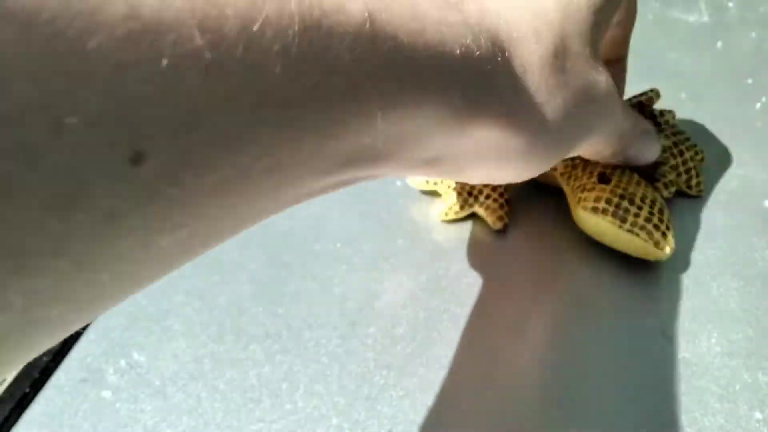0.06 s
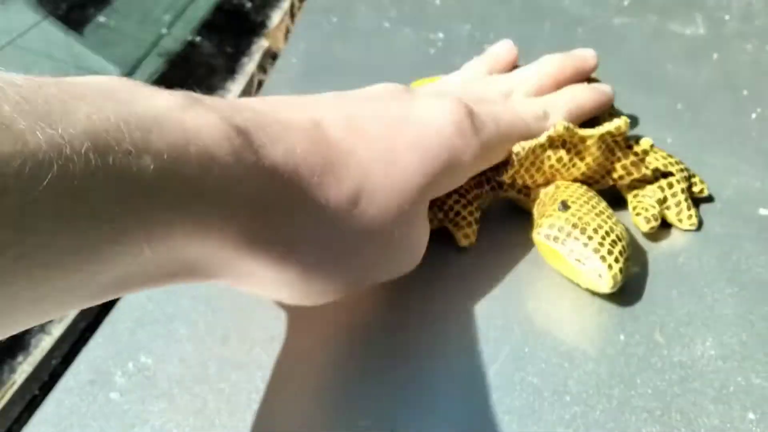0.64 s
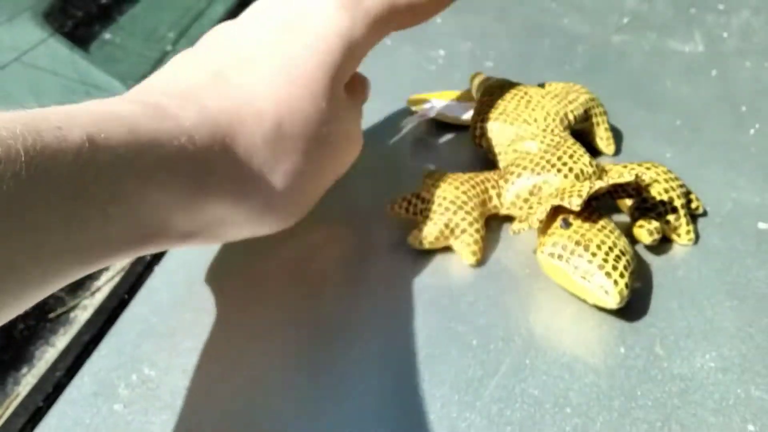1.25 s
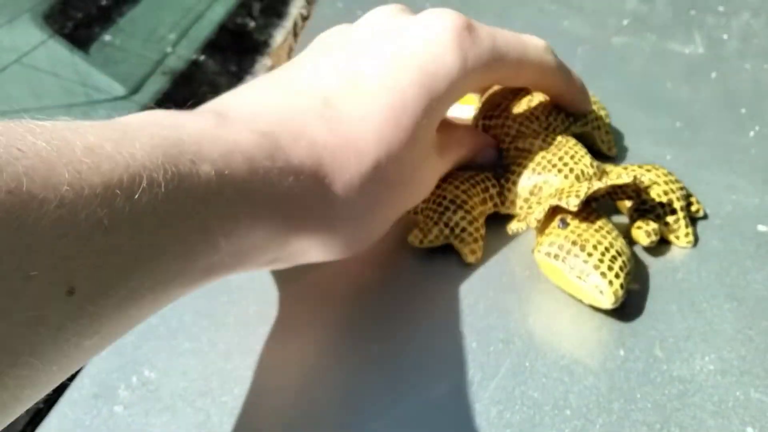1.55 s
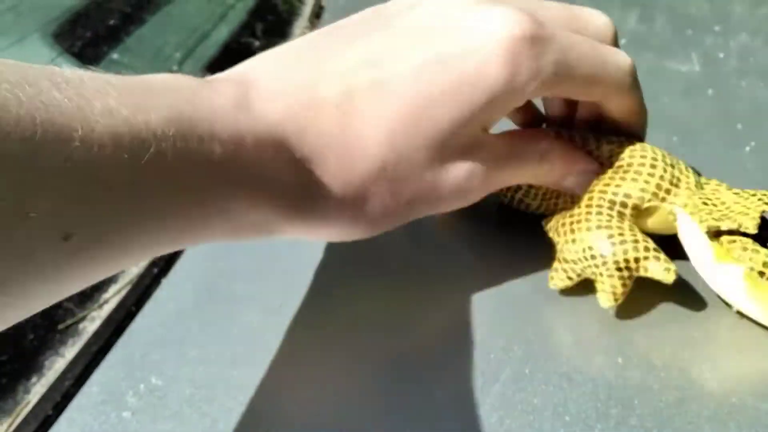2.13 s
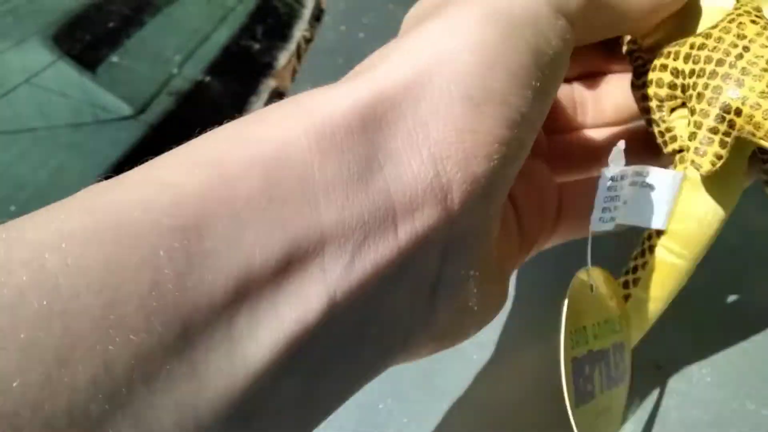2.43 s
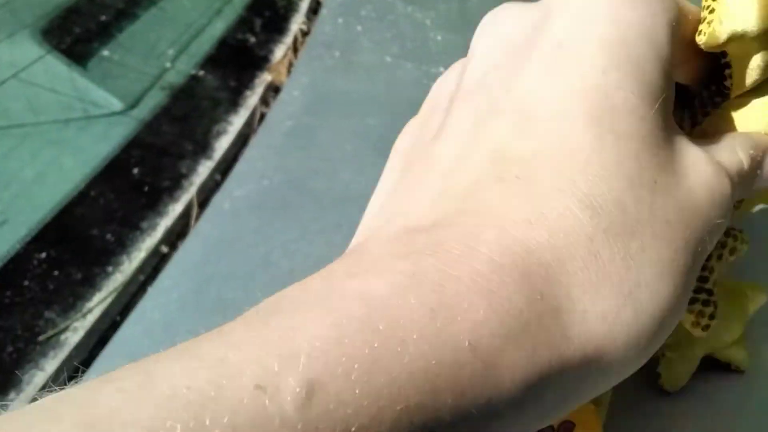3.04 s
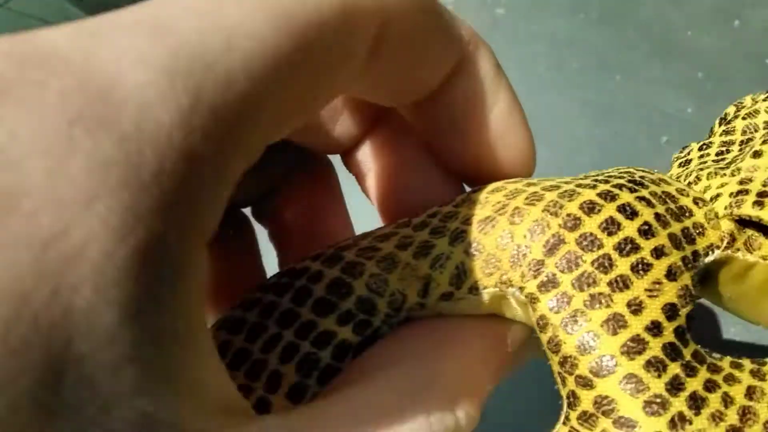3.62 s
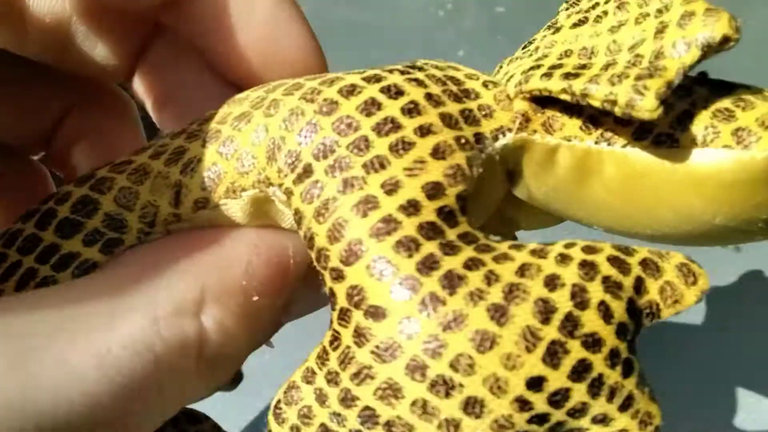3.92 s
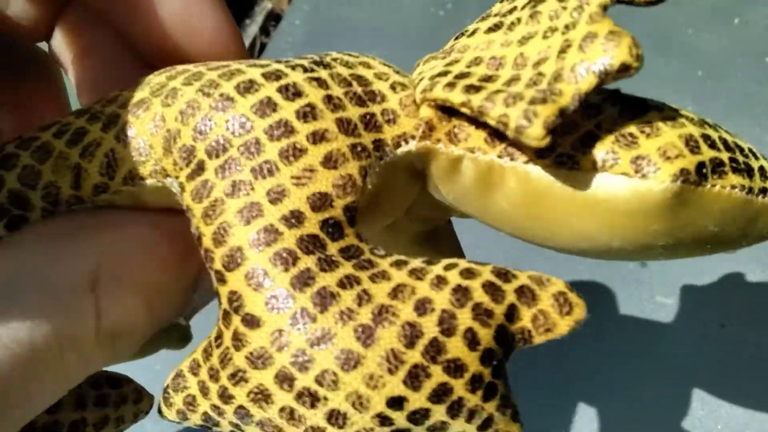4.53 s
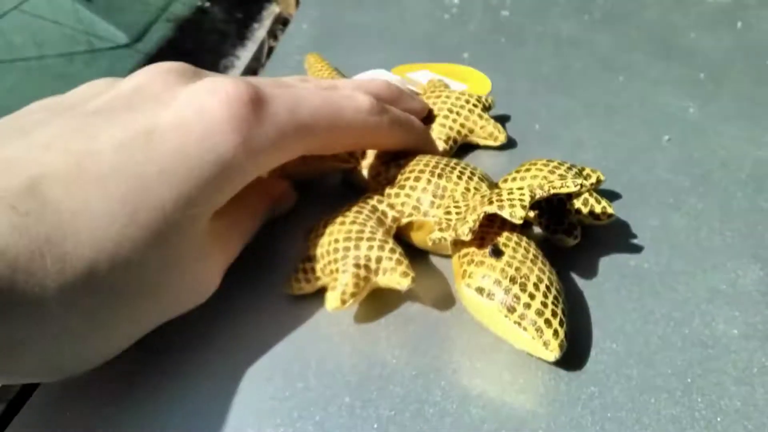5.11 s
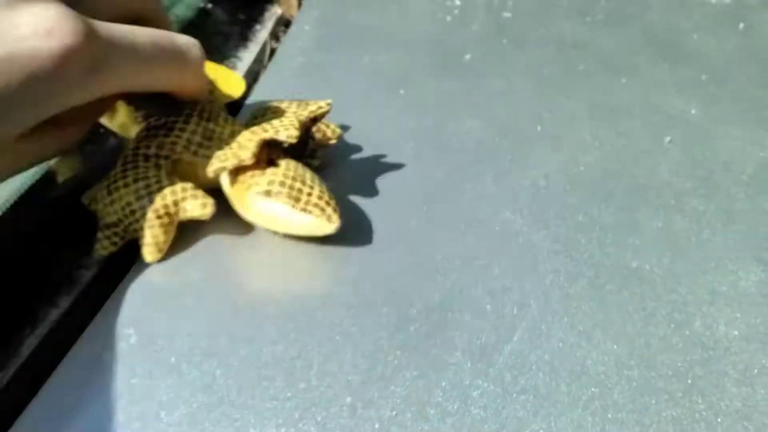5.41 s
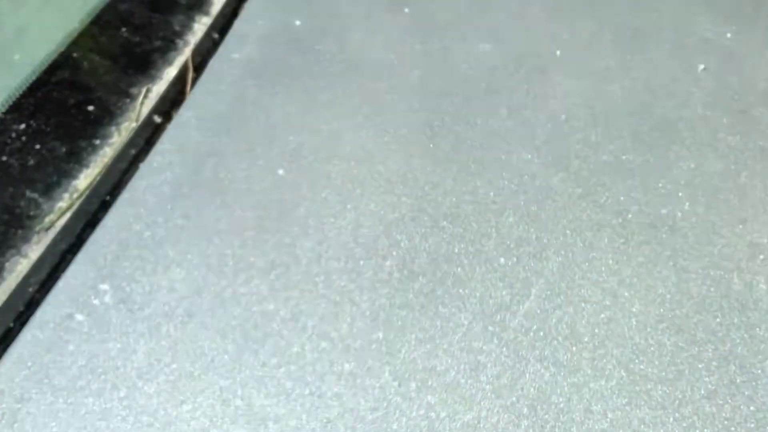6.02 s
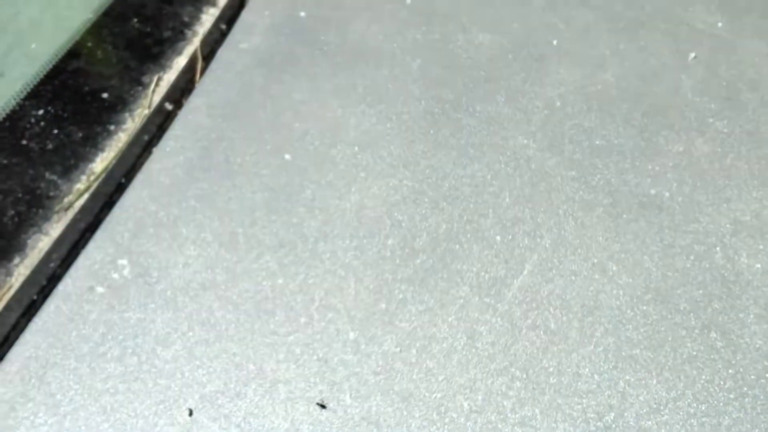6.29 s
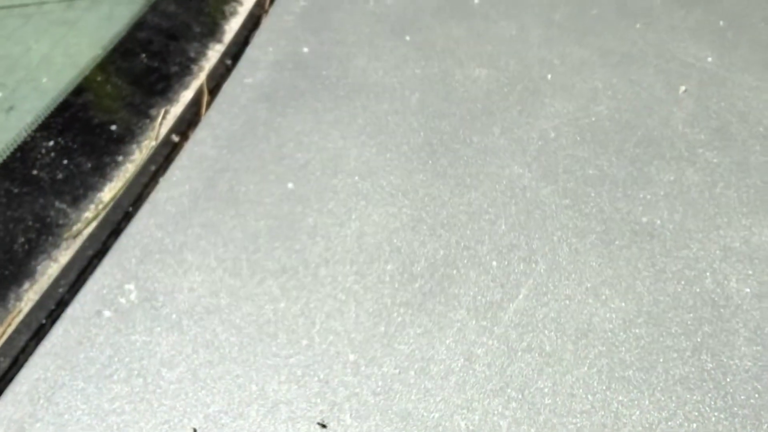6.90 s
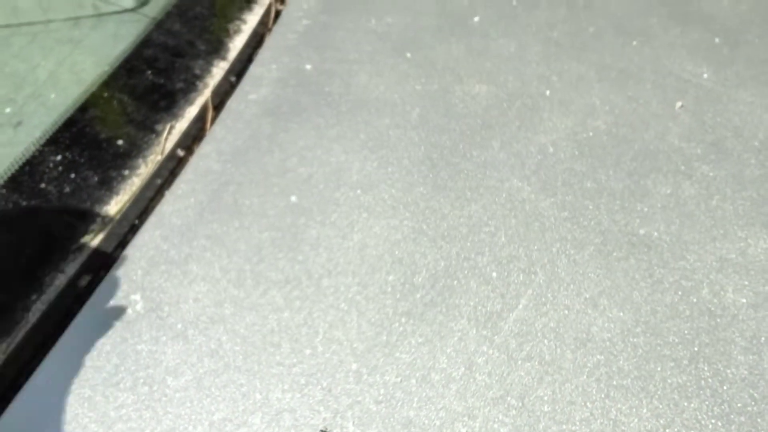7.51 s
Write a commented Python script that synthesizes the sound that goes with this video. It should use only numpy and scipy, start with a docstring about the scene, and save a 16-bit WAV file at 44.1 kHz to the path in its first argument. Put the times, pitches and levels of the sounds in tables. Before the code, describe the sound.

Close sandy rustles and small clicks from a handled soft toy, with dull thumps on sheet metal over a faint outdoor rumble.

```python
"""Sand hisses inside a cloth toy lizard, close by, over a low outdoor rumble and faint far drones.
The toy is squeezed, patted, picked up, dropped and dragged off a sheet-metal panel. Its filling slides
and crunches, its tag and seams tick, and every blow sets the panel's modes booming and sprays the sand.
A few far birds chirp through echoes; the cloth rasps on fingers and metal."""
import sys
import numpy as np
from scipy import signal
from scipy.fft import rfft, irfft, next_fast_len
from scipy.io import wavfile
from scipy.ndimage import uniform_filter1d, map_coordinates

SR = 44100
rng = np.random.default_rng(int(sys.argv[2]) if len(sys.argv) > 2 else 0)


def pcm_store(signal):
    """Save signal as 16-bit PCM."""
    levels = np.round(np.clip(np.atleast_2d(signal), -1, 1) * 32767)
    wavfile.write(sys.argv[1], SR, levels.astype(np.int16).T)


N = 341775


def amp(db):
    """Decibels to gain."""
    return 10 ** (np.asarray(db) / 20)


def unit(x):
    """Scale to rms 1."""
    return x / np.sqrt(np.mean(x ** 2) + 1e-20)


def along(points, hz):
    """Interpolate (freq_hz, value) points on a log frequency axis."""
    freqs, values = np.transpose(points)
    return np.interp(np.log(hz + 1), np.log(freqs + 1), values)


def wobble(rate_hz):
    """Smooth random curve with rate_hz knots a second."""
    knots = rng.standard_normal(int(N * rate_hz / SR) + 4)
    return map_coordinates(knots, [np.arange(N) * rate_hz / SR])


def filtered(x, response):
    """Apply a frequency response."""
    n = x.shape[-1]
    size = next_fast_len(n + min(n, SR // 2), real=True)
    return irfft(rfft(x, size) * response(np.fft.rfftfreq(size, 1 / SR)), size)[..., :n]


def resonance(f, hz, width_hz):
    """Causal resonance, peak gain 1."""
    return 1j * f * width_hz / (hz * hz - f * f + 1j * f * width_hz)


def add(track, start_s, sound):
    """Mix a sound into a track."""
    part = track[..., max(round(start_s * SR), 0):][..., :sound.shape[-1]]
    part += sound[..., :part.shape[-1]]


def burst(t, rise_s, t60_s):
    """Smooth onset, exponential decay, peak 1."""
    shape = (1 - np.exp(-(t / rise_s) ** 2)) * amp(-60 * t / t60_s)
    return shape / shape.max()


def grains(rate_hz, spread_db):
    """Tiny impacts of scattered size, at random moments shared by both channels; rms 1."""
    size = amp(spread_db * np.minimum(rng.standard_normal(N), 2.5))
    hits = rng.random(N) < rate_hz / SR
    return unit(size * hits * rng.standard_normal((2, N)))


def patchy(x, depth_db):
    """Make the colour drift in random patches of time and frequency."""
    spectrum = signal.stft(x, nperseg=512)[2]
    patches = uniform_filter1d(rng.standard_normal(spectrum.shape), size=6, axis=1)
    patches = uniform_filter1d(patches, size=22, axis=2)
    return signal.istft(spectrum * amp(depth_db * unit(patches)), nperseg=512)[1][:, :N]


def glides(rows):
    """Bands of noise that swell quickly, hold, waver, slide and fade."""
    out, waver = np.zeros((2, N)), wobble(35)
    for start_s, length_s, start_hz, end_hz, width_hz, level_db in rows:
        progress = np.linspace(0, 1, int(length_s * SR))
        flutter = filtered(rng.standard_normal((2, SR)), lambda f: 1 / (1 + (2 * f / width_hz) ** 4))
        bend = 1 + 0.029 * np.roll(waver, -int(start_s * SR))[:len(progress)]
        pitch_hz = (start_hz + (end_hz - start_hz) * progress) * bend
        carrier = np.sin(2 * np.pi * np.cumsum(pitch_hz) / SR)
        swell = np.abs(np.sin(np.pi * progress)) ** 0.26
        add(out, start_s, amp(level_db) * swell * unit(flutter[:, :len(progress)] * carrier))
    return out


def distant(x, t60_s=0.18):
    """Far sounds arrive as a cloud of echoes."""
    t = np.arange(SR // 2) / SR
    echoes = rng.standard_normal((2, len(t))) * amp(-60 * t / t60_s)
    return signal.fftconvolve(x, echoes / np.linalg.norm(echoes[0]), axes=1)[:, :N]


# left-right likeness: freq_hz, correlation
COHERENCE = [(60, 0.98), (130, 0.94), (290, .83), (640, 0.52), (1400, -0.27), (3000, -0.034), (7000, 0.026)]
def stereo(pair, spectrum):
    """Colour two unrelated signals and blend them into left and right; rms 1."""
    def response(f):
        angle = np.arccos(np.clip(along(COHERENCE, f), -1, 1)) / 2
        return amp(along(spectrum, f)) * [np.cos(angle), np.sin(angle)]
    mid, side = filtered(pair, response)
    return unit(np.array([mid + side, mid - side]))


# slides of the filling: crest_s, level_db, rise_s, fall_s, fizz_gain_db
SAND_SLIDES = [(.05, -54, 0.4, 0.64, -11), (.17, -50.5, 0.12, 0.15, 4), (.58, -52, 0.089, 0.12, -13),
               (.86, -54.5, 0.22, 0.093, -1), (1.02, -51.5, 0.074, 0.08, -1), (1.27, -62, 0.41, 0.22, -28),
               (1.595, -48.5, 0.043, .055, 1.5), (1.6, -56.5, .4, 0.53, -1), (1.961, -38, 0.045, 0.13, 5.5),
               (2.04, -40.5, 0.067, 0.12, 6), (2.27, -50, 0.54, 0.36, 3.5), (2.645, -40.5, 0.15, 0.19, 1),
               (2.9, -46, 0.059, 0.11, -0.5), (3.01, -48.5, .1, 0.25, 6.5), (3.44, -62, 0.09, 0.14, -6),
               (3.61, -67.5, 0.073, 0.092, 1), (3.83, -72, .12, 0.31, -6), (4.2, -71.5, .2, 0.11, -11),
               (4.62, -58.5, 0.17, 0.35, 1), (4.79, -55.5, 0.1, 0.4, 1), (5.06, -69, 0.18, 0.12, -14),
               (5.275, -39, 0.15, 0.28, 2.5), (5.42, -38, 0.075, 0.098, 6.5), (5.529, -38.5, 0.15, 0.2, 0),
               (5.85, -55.5, .2, 0.27, 1.5), (6.36, -74.5, 0.12, 0.28, -2), (6.98, -47.5, 0.23, 0.21, 3.5),
               (7.145, -49.5, 0.057, 0.11, 0), (7.33, -48.5, 0.11, 0.19, 2), (7.62, -49.5, 0.15, 0.16, 2.5)]
def sand_flow():
    """Hiss and fizz envelopes: squeezes, tilts and drags slide the filling; blows throw up a spray."""
    fade_db, roundness = 19.5, 1.55
    spray_speed, spray_fizz_db = 1.34, -2
    power, t = np.zeros((2, N)), np.arange(N) / SR
    for crest_s, level_db, rise_s, fall_s, fizz_gain_db in SAND_SLIDES:
        near = slice(max(int((crest_s - 2 * rise_s) * SR), 0), int((crest_s + 2 * fall_s) * SR))
        from_crest = np.maximum((crest_s - t[near]) / rise_s, (t[near] - crest_s) / fall_s)
        slide = amp(level_db - fade_db * from_crest ** roundness)
        power[:, near] += np.outer([1, amp(fizz_gain_db)], slide) ** 2
    for start_s, _, rise_s, cutoff_hz, spray_db in PANEL_BLOWS:
        spray = amp(spray_db) * shower_envelope(spray_speed * t[:SR // 2], rise_s, cutoff_hz)
        add(power, start_s, np.outer([1, amp(spray_fizz_db)], spray) ** 2)
    return np.sqrt(power)


# sand hiss: freq_hz, density_db
SAND_SPECTRUM = [(1180, -54), (2000, -20), (3840, -14.5), (4530, -10.5), (5030, -9.5), (5540, -6),
                 (6310, -4.5), (7250, 0.5), (8550, -3.5), (10600, -7.5), (13600, -4), (15100, -9),
                 (16000, -22.5)]
# cloth rub: freq_hz, density_db
CLOTH_SPECTRUM = [(200, -24.5), (400, 1), (900, -5.5), (1400, -2.5), (2300, -11.5), (3500, -12.5),
                  (6000, -33.5)]
def sand(fizz_hz=9000):
    """Grains slide inside the skin in small avalanches; the cloth rubs along."""
    flow, fizz_flow = sand_flow() * amp(3 + 1.4 * wobble(35) + 0.68 * wobble(220))
    crunch = grains(rate_hz=3500, spread_db=5) + .5 * grains(rate_hz=220, spread_db=3.5)
    crunch += rng.standard_normal((2, N))
    hiss = stereo(patchy(crunch, depth_db=2.5), SAND_SPECTRUM)  # the hand shades and reflects it
    fizz = filtered(hiss, lambda f: 1 - 1 / (1 + (f / fizz_hz) ** 12))
    friction = grains(rate_hz=450, spread_db=4) + .8 * rng.standard_normal((2, N))
    rub = stereo(friction, CLOTH_SPECTRUM)
    return flow * (hiss - fizz) + fizz_flow * fizz + amp(-36.5) * flow ** 0.7 * rub


# outdoor air: freq_hz, density_db
AIR_SPECTRUM = [(71, -34), (120, 3.5), (251, -4), (463, -12.5), (605, -8.5), (1430, -12.5), (2150, -25),
                (3050, -22), (4780, -26.5), (6630, -25), (8660, -40), (13300, -32.5), (16000, -41)]
# far rumble: freq_hz, density_db
RUMBLE_SPECTRUM = [(15, -54), (25, -10.5), (54, -9), (75, -4), (91, 2), (118, -15.5), (140, -8),
                   (200, -30.5), (260, -59.5), (440, -120)]
# rumble contour: time_s, level_db
RUMBLE_LEVELS = [(0, -67), (1.3, -65), (2.7, -67.5), (3.3, -70.5), (4.5, -68), (5.7, -65), (6.1, -68),
                 (6.8, -75.5), (7.0, -60), (7.22, -68.5), (7.4, -55.5), (7.58, -58.5), (7.75, -64)]
def outdoors():
    """Faint drifting air and a slowly changing far rumble."""
    air_db = -66 + 0.21 * wobble(1.7)
    air = stereo(patchy(rng.standard_normal((2, N)), depth_db=3.5), AIR_SPECTRUM)
    rumble_db = np.interp(np.arange(N) / SR, *np.transpose(RUMBLE_LEVELS)) + wobble(4.6)
    rumble = stereo(rng.standard_normal((2, N)), RUMBLE_SPECTRUM)
    return amp(air_db) * air + amp(rumble_db) * rumble


# far drones: start_s, length_s, start_hz, end_hz, width_hz, level_db
FAR_DRONES = [(0, .66, 320, 340, 150, -58), (0, .25, 760, 720, 450, -62), (5.88, .45, 1700, 1550, 450, -70),
              (6.95, .42, 1250, 1500, 550, -66)]
def drones():
    """Faint bands of noise, blurred by echoes."""
    return distant(glides(FAR_DRONES))


# tag and seam ticks: start_s, level_db, pitch_hz, knock_gain_db
SEAM_TICKS = [(.1117, -23.5, 8560, -44), (.2333, -27, 8350, -21), (.7706, -24.5, 7500, -32),
              (.7838, -11.5, 7680, -20), (.9682, -20.5, 5890, -9.5), (1.6345, -23, 12900, -30),
              (1.8632, -22.5, 12810, -20), (1.9483, -16, 11000, -22), (1.994, -17.5, 6900, -40.5),
              (2.0265, -9.5, 9460, -41), (2.0479, -11, 9600, -45.5), (2.0548, -6.5, 8630, -45),
              (2.0835, -16, 12050, -49), (2.305, -25, 6500, -15), (2.5101, -10, 6420, -13),
              (2.8715, -28.5, 6840, -21), (2.9857, -23.5, 6840, -41), (3.6316, -40, 6690, -29),
              (4.6046, -36, 7800, -37), (4.7164, -23, 7040, -22), (4.803, 3, 6870, -13.5),
              (4.8286, -4.5, 7240, -5), (4.8693, -9, 7730, -24), (4.9602, -28.5, 12900, -30),
              (5.2977, -20, 7620, -37), (5.3448, -13.5, 8300, -31), (5.3645, -12, 7600, -20.5),
              (5.415, -17, 9500, -37), (5.4344, -17, 7550, -40), (5.8125, -23, 6450, -9.5),
              (5.888, -30, 8230, -40)]
# the ticks' bright ring near 7 kHz: freq_hz, width_hz, gain_db
TICK_RESONANCES = [(4500, 140, -19), (5600, 140, -10), (7000, 390, -8), (7830, 190, -7), (8365, 300, -17.5),
                   (11900, 6500, -17)]
def ticks():
    """A snap and a short rattle with a bright ring; hard contacts add a lower knock."""
    def ring(f):
        peaks = sum(amp(db) * resonance(f, hz, width_hz) for hz, width_hz, db in TICK_RESONANCES)
        return peaks * resonance(f, 7500, 5600)

    def levelled(x):
        return x / np.sqrt(uniform_filter1d(x ** 2, size=66).max(axis=1, keepdims=True))

    out, t = np.zeros((2, N)), np.arange(SR // 20) / SR
    rattle = amp(-16) * burst(t, rise_s=0.0024, t60_s=0.06)
    envelope = burst(t, rise_s=0.00051, t60_s=0.0054) + rattle
    for start_s, level_db, pitch_hz, knock_gain_db in list(SEAM_TICKS) + slips():
        contact = envelope * rng.standard_normal((2, len(t)))
        snap = levelled(filtered(contact, lambda f: ring(f) + amp(-3.5) * resonance(f, pitch_hz, 5500) ** 3))
        knock = levelled(filtered(contact, lambda f: resonance(f, 1400, 3000) ** 2))
        add(out, start_s, amp(level_db - 9) * (snap + amp(knock_gain_db - 1.5) * knock))
    return out


# tightening grips: start_s, length_s, rate_hz, level_db, knock_gain_db
CLOTH_GRIPS = [(0.15, .05, 52, -31, -24), (2.114, .07, 53, -32.5, -14), (2.242, .05, 46, -33.5, -10),
               (3.278, .05, 25, -41.5, -29), (3.411, .05, 24, -45, -6.5)]
def slips():
    """Gripped cloth sticks and slips in uneven runs; returns rows of ticks."""
    rows = []
    for start_s, length_s, rate_hz, level_db, knock_gain_db in CLOTH_GRIPS:
        scatter = rng.standard_normal((16, 3))[:int(length_s * rate_hz) + 1]
        for k, (late, strong, high) in enumerate(scatter):
            slip_s = start_s + (k + .15 * late) / rate_hz
            pitch_hz = 7800 * np.exp(0.14 * high)
            rows.append((slip_s, level_db + 4.5 * strong, pitch_hz, knock_gain_db))
    return rows


def shower_envelope(t, rise_s, cutoff_hz):
    """The filling lands and settles, later after slow or dull blows, then creeps on faintly."""
    slowness, dullness = rise_s / .005, 400 / cutoff_hz
    settle_s = 0.18 * slowness ** 0.99 * dullness ** 0.094
    creep = amp(-23) * burst(t, rise_s=0.024, t60_s=0.36)
    return burst(t, rise_s, settle_s) + creep


# sheet-metal modes: freq_hz, gain_db
PANEL_MODES = [(74, -6), (98, -7.5), (118, -0.5), (134, -5.5), (160, -9.5), (182, -5), (203, -6.5),
               (232, -11), (264, -11.5), (291, -7), (335, -6), (385, -8.5), (431, -8), (488, -6.5),
               (530, -8.5), (572, -13.5), (614, -7), (706, -3), (780, -15.5), (834, -10), (893, -10.5),
               (1007, -9), (1618, -8.5), (2048, -13.5)]
def panel_response(f):
    """The metal's modes, higher ones dying sooner, plus the soft toy's dead thud and slap."""
    modes = sum((-1) ** k * amp(db - 11) * resonance(f, hz, width_hz=5.5 + hz / 80)
                for k, (hz, db) in enumerate(PANEL_MODES))
    thud = amp(-14) * resonance(f, 170, 210) ** 2
    slap = amp(-24.5) * resonance(f, 1100, 1500)
    highpass = (1j * f / (40 + 1j * f)) ** 2
    return (modes + thud + slap) * highpass


# soft blows: start_s, level_db, rise_s, cutoff_hz, spray_db
PANEL_BLOWS = [(.466, -43.5, 0.01, 184, -43.5), (.531, -52, 0.0051, 150, -70),
               (.769, -28, 0.0064, 397, -37), (.949, -29, 0.0037, 150, -43.5),
               (1.861, -50.5, 0.031, 501, -50.5), (1.986, -44, 0.011, 260, -52),
               (2.513, -46, 0.0053, 800, -68), (2.585, -54.5, 0.0049, 128, -70),
               (4.812, -24, 0.0067, 850, -28.5), (4.837, -16, 0.0025, 847, -20),
               (4.871, -22.5, 0.0045, 110, -40.5), (5.255, -52, 0.0046, 800, -54),
               (5.365, -40, 0.0038, 520, -58), (5.533, -43, 0.0013, 523, -58),
               (6.703, -51, 0.014, 760, -45)]
def panel():
    """Each blow drives the panel with one firm push and a shower of small ones from the filling."""
    def peak_rms(force):
        return np.sqrt(uniform_filter1d(filtered(force, panel_response) ** 2, size=1300).max())

    contact_s = .001
    balance_db, push_growth = -22.5, 0.57  # above balance_db the push outweighs the shower
    force, t = np.zeros((2, N)), np.arange(SR // 2) / SR
    push = -(t / contact_s) ** 2 * np.exp(-t / contact_s)
    push /= peak_rms(push)
    for start_s, level_db, rise_s, cutoff_hz, _ in PANEL_BLOWS:
        impacts = rng.standard_normal((2, len(t))) * shower_envelope(t, rise_s, cutoff_hz)
        shower = filtered(impacts, lambda f: 1 / (1 + 1j * f / cutoff_hz) ** 2)
        blow = shower / peak_rms(shower[0]) + amp(push_growth * (level_db - balance_db)) * push
        add(force, start_s, amp(level_db) * blow / peak_rms(blow[0]))
    mid, side = filtered(force, panel_response)
    # higher modes reach the two channels less alike: freq_hz, gain_db
    side_gains = [(100, -17), (300, -7), (600, -9.5), (1200, 1)]
    side = filtered(side, lambda f: 1j * amp(along(side_gains, f)))
    return np.array([mid + side, mid - side])


# chirps: start_s, length_s, start_hz, end_hz, width_hz, level_db
BIRD_CHIRPS = [(1.14, .19, 3600, 2650, 420, -70.5), (2.74, .12, 3000, 2500, 400, -70),
               (3.76, .15, 7800, 8200, 800, -68), (4.07, .09, 3600, 2600, 600, -69.5),
               (4.16, .1, 2750, 3150, 380, -69.5), (4.25, .1, 2700, 2400, 400, -72),
               (5.77, .14, 3100, 3600, 600, -64.5), (6.22, .1, 7000, 7100, 600, -69),
               (7.1, .17, 2800, 3200, 800, -66)]
def birds():
    """Short glides from far trees, blurred by echoes."""
    return distant(glides(BIRD_CHIRPS))


# cloth rasps: start_s, length_s, start_hz, end_hz, width_hz, level_db
CLOTH_RASPS = [(2.866, .09, 4200, 4350, 1000, -47.5), (3.12, .04, 1750, 1700, 500, -62),
               (5.2, .2, 1500, 1400, 500, -58), (5.34, .1, 480, 340, 380, -46),
               (5.526, .03, 350, 340, 200, -43.5), (5.55, .25, 300, 350, 140, -60),
               (6.7, .08, 400, 340, 400, -53), (6.89, .1, 450, 300, 400, -62)]
def rasps():
    """Cloth scrapes briefly on fingers and panel."""
    return glides(CLOTH_RASPS)


# toy's stereo balance: freq_hz, left_over_right_db
TOY_BALANCE = [(60, 2.5), (200, 1.2), (400, 3), (2400, 1.5), (4400, 2), (8100, 8.5), (11000, 13),
               (15000, 17)]
def lean_left(x):
    """The toy is nearer the left microphone port; the right is shadowed in the treble."""
    def response(f):
        gains = amp(np.outer([.5, -.5], along(TOY_BALANCE, f)))
        return gains / np.sqrt(np.mean(gains ** 2, axis=0))
    return filtered(x, response)


def scene():
    """The toy close by, the outdoors behind it."""
    toy = lean_left(sand() + panel() + ticks() + rasps())
    return toy + birds() + drones() + outdoors()


def record(dry):
    """Clip at full scale, then low-pass steeply."""
    cutoff_hz = 16100
    return filtered(np.clip(dry, -1, 1), lambda f: 1 / (1 + (f / cutoff_hz) ** 150))


dry = scene()
out = record(dry)
pcm_store(out)
```